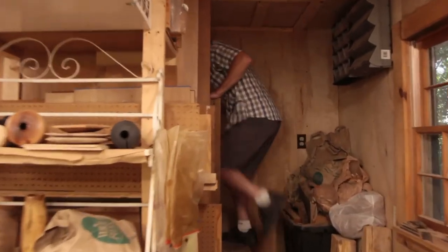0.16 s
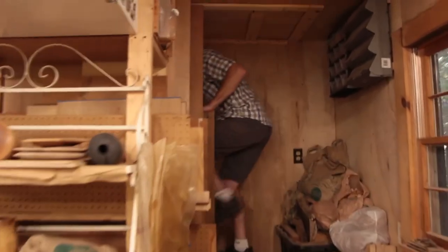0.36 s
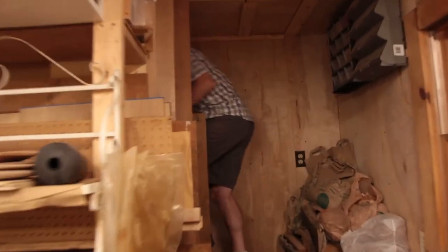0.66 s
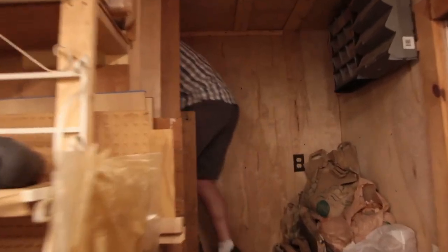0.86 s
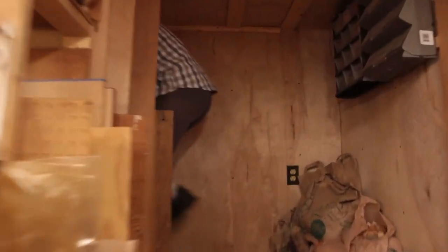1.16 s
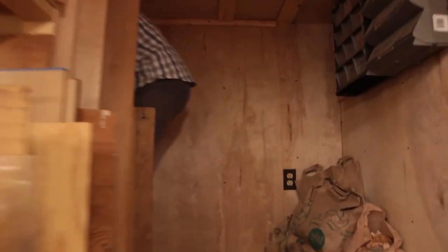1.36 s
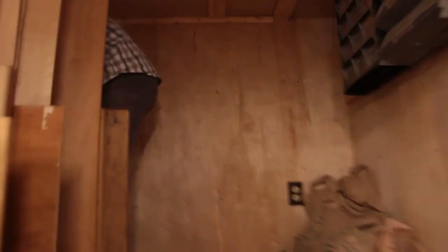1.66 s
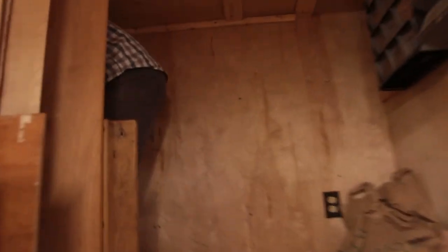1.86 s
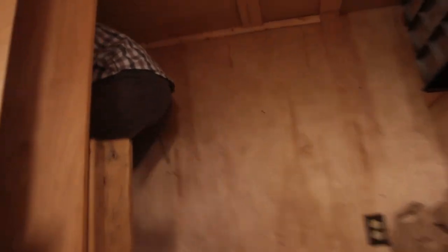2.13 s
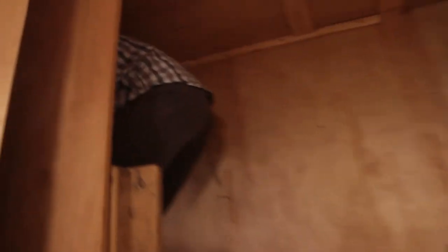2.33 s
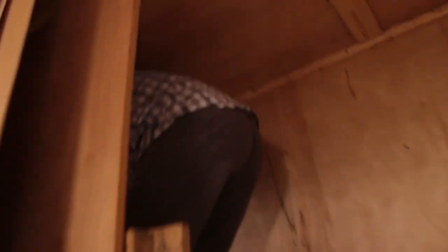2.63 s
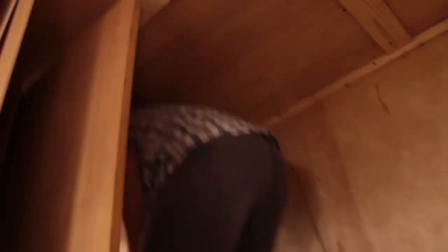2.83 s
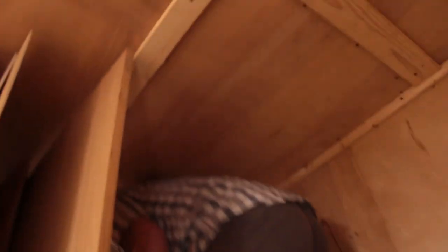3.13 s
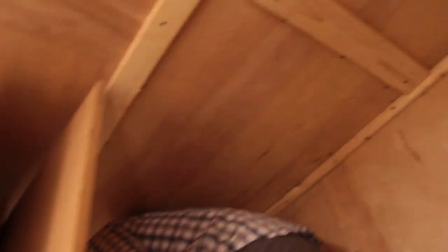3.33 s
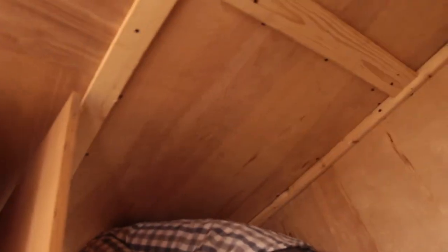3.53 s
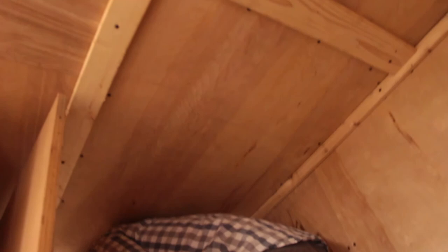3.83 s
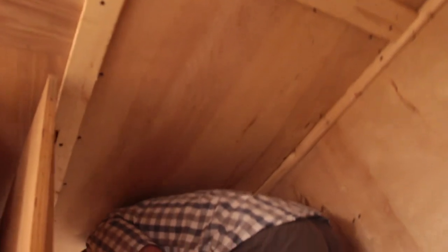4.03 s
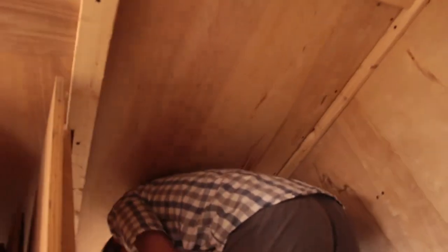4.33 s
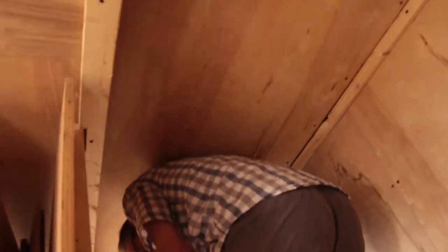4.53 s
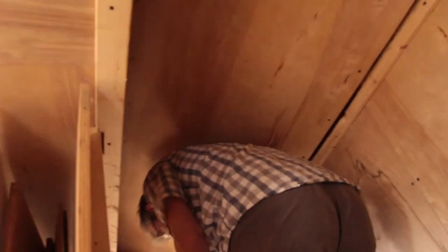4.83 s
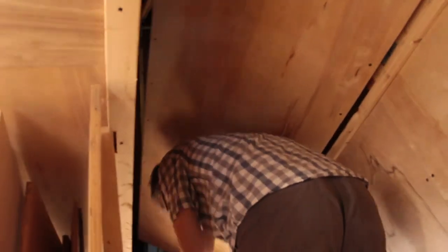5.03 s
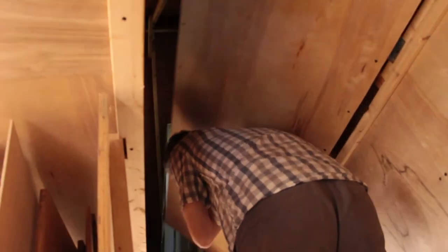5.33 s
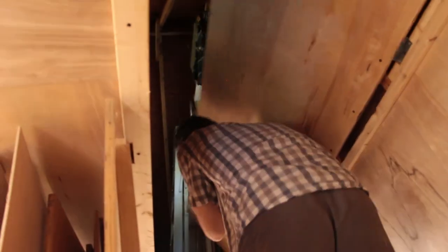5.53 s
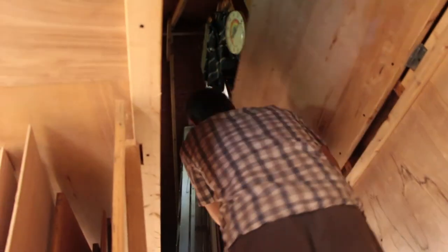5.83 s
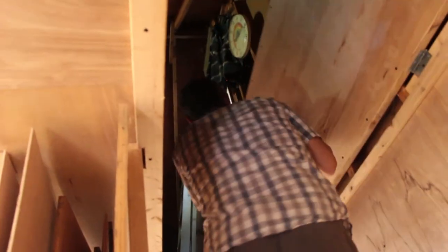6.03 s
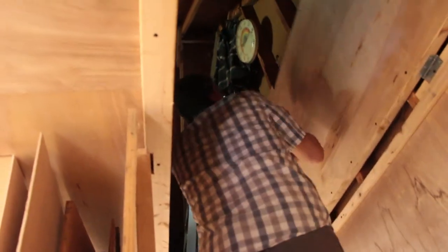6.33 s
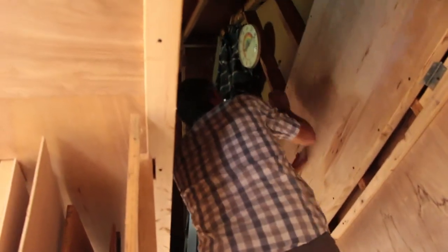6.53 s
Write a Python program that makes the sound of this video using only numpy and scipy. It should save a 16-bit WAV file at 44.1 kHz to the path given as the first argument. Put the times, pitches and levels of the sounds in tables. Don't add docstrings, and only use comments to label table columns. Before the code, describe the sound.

Three woody footfalls climb creaky timber treads in a small humming workshop, followed by bolt chatter, cloth dragging, a deep boom and a clattering landing.

```python
import sys
import numpy as np
from scipy import signal
from scipy.fft import rfft, irfft
from scipy.io import wavfile
from scipy.ndimage import uniform_filter1d

SR = 44100
rng = np.random.default_rng(int(sys.argv[2]) if len(sys.argv) > 2 else 0)


def bounce(signal):
    frames = np.transpose(np.atleast_2d(signal))
    limited = np.clip(frames, -1, 1)
    pcm = np.round(limited * 32767).astype(np.int16)
    wavfile.write(sys.argv[1], SR, pcm)


def gain_from_db(level_db):
    decades = np.asarray(level_db, float) / 20
    return 10 ** decades


N = 294595

ROOM_DB = -11
LEAD_S = 0.001


def rms_one(x):
    return x / np.sqrt(np.mean(x ** 2) + 1e-20)


def in_time(rows):
    s, *columns = np.transpose(rows)
    return [np.interp(np.arange(N) / SR, s, c) for c in columns]


def at_hz(points, hz):
    points = np.array(points)
    return np.interp(np.log(hz), np.log(points[:, 0]), points[:, 1])


def drift(rate):
    r = np.exp(-80 * np.pi * rate / SR)
    slow = signal.lfilter([1], [1, -2 * r, r * r], rng.standard_normal(N // 40 + 2002))[2000:]
    return np.interp(np.arange(N) / 40, np.arange(len(slow)), rms_one(slow))


def swells(rows):
    t = np.arange(0, N + 16, 16) / SR
    humps = 0
    for s, level_db, rise, fall in rows:
        quarter = np.interp(t, [s - rise, s, s + fall], [0, np.pi / 2, 0])
        humps = humps + gain_from_db(level_db) * np.sin(quarter) ** 2.8
    return np.interp(np.arange(N) / SR, t, humps)


def add(out, s, sound):
    at = round(s * SR)
    out[at:at + len(sound)] += sound[:N - at]


def bandpass(x, order, low_hz, high_hz):
    return signal.sosfilt(signal.butter(order, [low_hz, high_hz], "band", fs=SR, output="sos"), x)


def banded(spectrum, patchy_db, grain_db):
    out = 0
    low, high = spectrum[0][0], spectrum[-1][0]
    white = rng.standard_normal((2, N)) * gain_from_db(grain_db * drift(140))
    edges = np.geomspace(low, high, 2 + int(2 * np.log2(high / low)))
    for k, (low_hz, high_hz) in enumerate(zip(edges, edges[1:])):
        band = bandpass(white[k % 2], 2, low_hz, high_hz)
        level_db = at_hz(spectrum, np.sqrt(low_hz * high_hz)) + patchy_db * drift(2.8)
        out = out + gain_from_db(level_db) * band
    return out


def resonance(x, hz, width_hz):
    r = np.exp(-np.pi * width_hz / SR)
    poles = [1, -2 * r * np.cos(2 * np.pi * hz / SR), r * r]
    return signal.lfilter([(1 - r * r) / 2, 0, (r * r - 1) / 2], poles, x)


def workshop(x, echo_db=ROOM_DB):
    t60_s = 0.27
    t = np.arange(SR // 3) / SR
    dull, bright = rng.standard_normal((2, len(t))) * (t > 0.003)
    dull = bandpass(dull, 1, 150, 3800)
    echoes = rms_one(dull) * gain_from_db(-60 * t / t60_s) + 2.77 * bright * gain_from_db(-60 * t / (0.61 * t60_s))
    return x + gain_from_db(echo_db) * signal.fftconvolve(x, echoes / np.linalg.norm(echoes))[:len(x)]


# frequency_hz, level_db
AIR = [(79, -35), (135, -4), (162, -9.5), (232, -1), (374, -42.5), (525, -12.5), (695, -26.5),
       (1510, -35.5), (1780, -25.5), (4920, -37), (13100, -46.5), (16000, -35)]


def room_air():
    return gain_from_db(-52) * rms_one(banded(AIR, patchy_db=0.5, grain_db=0.0))


# frequency_hz, level_db (rms)
HUM = [
    (58.55, -34.5),
    (92.5, -43.5),
    (117.1, -40),
    (175.7, -55),
    (234.2, -55.5),
    (543.7, -68.5),
    (602.9, -66.5),
    (877.5, -68.5),
    (1771, -88),
]
# time_s, level_db of the lowest line
BEARING = [(0, -1), (.76, -2.5), (1.1, -6), (1.8, -5), (2.18, -0.5), (2.55, -3), (3.05, -1.5), (3.6, 0),
           (4.7, 0.5), (5.1, -1), (6.68, -1)]
# time_s, level_db
EXPOSED = [(.5, -4), (1.1, -0.7), (4.7, -0.5), (5.3, -4.5)]


def motor():
    mains_hz, in_step_s, mains_db = 120, 3.3, -9
    t = np.arange(N) / SR
    slip = 0.00035 * np.cumsum(drift(1.4)) / SR
    turns, levels = [], []
    for hz, level_db in HUM:
        turns.append(hz * (t + slip) + rng.random())
        levels.append(gain_from_db(level_db + 2 + 0.26 * drift(3.0)))
    lowest, *upper = np.multiply(levels, np.sin(2 * np.pi * np.array(turns)))
    mains_turns = mains_hz * (t - in_step_s) + turns[2][round(in_step_s * SR)]
    buzz = levels[2] * gain_from_db(mains_db) * np.sin(2 * np.pi * mains_turns)
    return gain_from_db(in_time(BEARING)[0]) * lowest + gain_from_db(in_time(EXPOSED)[0]) * (sum(upper) + buzz)


# time_s, level_db
WEIGHT = [(0, -55.5), (.37, -39.5), (.65, -39.5), (1.51, -51), (1.69, -30), (2.01, -45), (2.47, -38.5),
          (2.71, -37.5), (2.88, -45), (3.31, -45), (3.81, -50), (4.33, -30.5), (4.76, -55), (5.07, -36),
          (5.45, -44.5), (6.19, -41.5), (6.47, -53), (6.68, -41)]
# loudest_s, level_db, rise_s, fall_s
SHUFFLES = [
    (2.88, -44.5, 0.062, 0.24),
    (3.81, -56, 0.26, 0.2),
    (5.05, -47.5, 0.51, 0.35),
    (5.65, -54.5, 0.29, 0.99),
    (6.64, -43, 0.16, 0.086),
]


def frame():
    shiver_db, = in_time(WEIGHT)
    shiver = rms_one(bandpass(rng.standard_normal(N), 2, 22, 42))
    rumble = rms_one(bandpass(rng.standard_normal(N), 2, 45, 300))
    rumble_level = (gain_from_db(-53.5) + swells(SHUFFLES)) * gain_from_db(0.51 * drift(26))
    return gain_from_db(shiver_db) * shiver + rumble_level * rumble


# loudest_s, level_db, rise_s, fall_s, brightness_db
BRUSHES = [(.001, -52.5, .01, 0.023, -16.5), (.33, -63.5, 0.38, 0.24, -4.5), (.436, -61.5, 0.099, 0.2, -10),
           (.822, -62, 0.11, 0.16, 8), (1.23, -63.5, 0.4, 0.18, 2), (1.66, -72, 0.08, 0.14, 9),
           (1.888, -69, 0.17, .07, 1), (2.06, -67, 0.2, 0.28, 2.5), (2.7, -70.5, 0.077, .04, -17),
           (3.75, -76, .13, 0.22, 0), (3.97, -70, 0.058, 0.15, -10), (4.86, -72, 0.19, 0.089, -20),
           (5.784, -57.5, 0.089, 0.089, -12), (5.96, -73, 0.16, 0.11, 10), (6.146, -58, 0.01, 0.065, -11),
           (6.478, -51, 0.13, 0.12, -13), (6.6, -69, 0.053, 0.08, -12)]
# loudest_s, level_db, rise_s, fall_s, brightness_db
DRAGS = [
    (4.97, -56, 0.12, 0.049, -5),
    (5.076, -45, 0.14, 0.15, -7.5),
    (5.33, -52, 0.093, 0.15, -8.5),
    (5.46, -50.5, 0.13, 0.21, -12),
    (5.62, -56, 0.14, 0.22, -5),
]
# start_s, rasp_db, bright_db, rise_s, length_s
SCUFFS = [(0.548, -49, -49, 0.0025, 0.035), (0.76, -62, -59, .003, .012), (0.813, -62, -69, 0.0073, 0.0098),
          (0.85, -57, -66, 0.0089, 0.014), (1.589, -70, -61, .005, 0.028),
          (2.3862, -33.5, -54, 0.001, 0.004), (2.388, -43, -55, .004, 0.016),
          (2.751, -54, -74, 0.012, 0.025), (2.844, -50, -61, .001, 0.033),
          (2.901, -57, -63.5, 0.0044, 0.078), (4.227, -59, -58, 0.0044, 0.013),
          (4.238, -58, -64, .02, 0.064), (4.305, -54, -62, 0.04, 0.27), (4.318, -55, -60, 0.0043, 0.023),
          (5.1798, -45, -49, 0.001, 0.0095), (5.184, -54, -47, .008, 0.03),
          (5.942, -76, -68, 0.0045, 0.022), (6.143, -53, -68, .002, 0.007),
          (6.487, -48.5, -51.5, .006, 0.049), (6.631, -63, -60, .004, 0.017)]
STIR_DB = [-61.5, -75.5, -73.5]
# frequency_hz, level_db
DULL = [(350, -3), (800, -1.5), (1800, -7)]
RASP = [(1400, 0.5), (2800, 2), (5600, -5)]
BRIGHT = [(2650, -31), (4500, 3.5), (4900, 1), (7730, -5.5), (15000, -8.5), (16000, -17)]


def register(rows, over_db, lean):
    return swells([(s, db + over_db + lean * tilt_db, rise, fall) for s, db, rise, fall, tilt_db in rows])


def rustle():
    dull_trade = 0.63
    dull = gain_from_db(STIR_DB[0]) + register(BRUSHES, -1.5, -dull_trade) + register(DRAGS, -11, -dull_trade)
    rasp = gain_from_db(STIR_DB[1]) + register(BRUSHES + DRAGS, 0, 0)
    bright = gain_from_db(STIR_DB[2]) + register(BRUSHES + DRAGS, 0, 0.51)
    t = np.arange(SR) / SR
    for s, rasp_db, bright_db, rise, length in SCUFFS:
        fade = np.exp(-(np.maximum(t - rise, 0) / length) ** 2.1)
        stroke = np.minimum(t / rise, 1) * fade
        add(dull, s, gain_from_db(rasp_db - 3.0) * stroke)
        add(rasp, s, gain_from_db(rasp_db) * stroke)
        add(bright, s, gain_from_db(bright_db) * stroke)
    out = 0
    for level, spectrum in ((dull, DULL), (rasp, RASP), (bright, BRIGHT)):
        out = out + level * rms_one(banded(spectrum, patchy_db=1.7, grain_db=0.5))
    return out


# frequency_hz, width_hz, level_db
LATCH = [
    [(403, 21, 0.5), (652, 36, 7)],
    [(900, 55, -13), (1071, 46, -1.5)],
    [(1676, 24, -3)],
    [(1400, 60, -2), (2200, 150, -5)],
    [(3160, 250, -0.5), (3760, 300, 4.5), (4100, 490, 3.5), (5550, 380, 0), (6240, 500, -1)],
]
# loudest_s, level_db, rise_s, fall_s
SLIDE = [
    [(4.33, -44, 0.03, 0.083), (4.43, -50, 0.053, 0.091), (4.5, -53, 0.036, 0.056),
     (4.56, -51.5, 0.07, 0.039)],
    [(4.322, -49, 0.015, 0.04), (4.365, -48.5, .03, 0.05), (4.41, -42, 0.02, 0.034),
     (4.455, -46.5, 0.048, 0.068)],
    [(4.34, -54, .03, .05), (4.408, -43, .008, 0.026), (4.455, -50, 0.033, .04), (4.505, -56, 0.043, .04)],
    [(4.34, -62, 0.032, .06), (4.41, -61, .012, 0.027), (4.46, -59, 0.045, 0.074),
     (4.578, -53, 0.056, 0.066)],
    [(4.335, -52, 0.053, 0.091), (4.405, -53.5, .012, 0.041), (4.46, -48, 0.038, 0.055),
     (4.52, -54.5, 0.035, 0.054), (4.59, -53.5, 0.076, 0.12)],
]


def locked(x):
    sing = 0.64
    x = rms_one(x)
    return x / (uniform_filter1d(x ** 2, size=300) + 0.05) ** (sing / 2)


def latch():
    slips = (rng.random(N) < 2500 / SR) * rng.standard_normal(N)
    pressure = drift(47.5)
    slips = slips * gain_from_db(0.98 * pressure) + 1e-18
    out = 0
    for k, (part, bursts) in enumerate(zip(LATCH, SLIDE)):
        rung = 0
        for hz, width_hz, level_db in part:
            once = resonance(slips, hz, 1.3 * width_hz)
            rung = rung + gain_from_db(level_db) * locked(resonance(once, hz, 1.3 * width_hz))
        push = uniform_filter1d(np.roll(pressure, k * SR), size=900)
        bent = np.arange(N) + 0.008 * np.cumsum(push)
        out = out + swells(bursts) * rms_one(np.interp(bent, np.arange(N), rung))
    return out


# start_s, peak_db, low_hz, high_hz, t60_s
CRACKS = [(0.5513, -22, 2420, 4100, 0.02), (.557, -39, 2000, 4300, 0.074), (.565, -27.5, 500, 2600, 0.087),
          (0.567, -40, 4000, 7000, .04), (1.5175, -19.5, 900, 4850, 0.016),
          (1.528, -32.5, 2200, 5200, 0.049), (1.549, -40, 2500, 4800, 0.037), (1.55, -39, 700, 2600, 0.062),
          (2.334, -31, 1800, 6260, 0.012), (2.334, -52, 7000, 15000, .04),
          (2.343, -29.5, 1000, 3280, 0.068), (2.3425, -45, 4000, 7500, 0.11),
          (2.343, -50, 7500, 15000, .06), (2.3862, -28, 1500, 7300, 0.043),
          (2.386, -37, 7500, 15500, 0.022), (2.849, -41, 1000, 9000, .015), (4.2965, -37, 1500, 9000, .012),
          (4.316, -45, 695, 1500, .04), (4.404, -42, 1200, 4500, .03), (5.181, -39, 600, 5000, .03),
          (5.183, -40, 6000, 15500, .02), (6.464, -28, 800, 1800, 0.061), (6.477, -20.5, 200, 700, 0.038),
          (6.4889, -27, 510, 2650, 0.022), (6.497, -28, 900, 2540, 0.056), (6.516, -28, 700, 2280, 0.071),
          (6.602, -32, 300, 1500, 0.05), (6.619, -40, 393, 2440, 0.035)]


def cracks():
    out, t = np.zeros(N), np.arange(SR // 6) / SR
    for s, peak_db, low_hz, high_hz, t60 in CRACKS:
        noise = rng.standard_normal(len(t)) * gain_from_db(-60 * t / t60)
        band = bandpass(noise, 4, low_hz, high_hz)
        add(out, s, gain_from_db(peak_db) * band / np.abs(band).max())
    return out


# loudest_s, peak_db, pitch_hz, rise_s, fall_s
CHOKED = [(.5533, -9, 807, .003, 0.0034), (.566, -24, 613, .006, 0.0064), (.576, -28, 800, .006, .008),
          (1.5178, -10.5, 1490, 0.0012, 0.0012), (1.5204, -6.5, 450, 0.0027, 0.0038),
          (1.5247, -12, 366, .003, 0.0064), (0.5521, -21, 2910, .0015, .004), (.558, -29, 2100, .003, .004),
          (.564, -25, 1400, 0.0036, .005), (2.884, -36, 518, .006, 0.011), (4.575, -39, 250, .015, .015),
          (4.5, -50, 654, .04, .04), (2.91, -36, 500, 0.0041, .012), (5.1837, -35, 2500, 0.00111, 0.0033),
          (6.482, -20, 650, .004, 0.0021), (6.483, -23, 1350, .003, .003),
          (6.514, -22.5, 900, 0.0031, .004), (6.621, -27.5, 762, .004, 0.0045),
          (2.3339, -19, 2470, 0.00088, .003), (2.337, -15, 388, 0.0033, 0.0084),
          (5.1852, -19, 704, 0.0019, 0.0039), (5.191, -41, 4500, 0.0064, .005),
          (6.4868, -17.5, 1590, .002, 0.0026), (6.4875, -12, 690, 0.0041, 0.0048),
          (6.4906, -14.5, 1255, 0.0019, .003), (6.498, -20.5, 1550, .003, 0.0023)]


def choked():
    out, t = np.zeros(N), np.arange(SR // 10) / SR
    for s, peak_db, hz, rise, fall in CHOKED:
        grip = np.sin(np.interp(t, [0, rise, rise + fall], [0, np.pi / 2, 0])) ** 2.5
        add(out, s - rise, gain_from_db(peak_db) * grip * np.sin(2 * np.pi * hz * t))
    return out


# start_s, peak_db, pitch_hz, t60_s
RINGS = [(0.551, -22, 3050, 0.013), (.553, -27, 990, .09), (.554, -32, 800, 0.081), (.555, -28, 526, 0.12),
         (0.557, -27, 1213, 0.075), (.553, -34, 3300, 0.064), (0.557, -16.5, 188, 0.098),
         (0.559, -30, 1464, 0.075), (1.4515, -44, 3050, 0.028), (1.518, -30, 1663, 0.04),
         (1.519, -16, 450, 0.066), (1.52, -28, 372, 0.07), (1.52, -24, 860, 0.11), (1.52, -25, 1210, 0.096),
         (1.521, -26, 631, 0.076), (1.519, -33, 3030, 0.047), (2.335, -35, 2035, 0.07),
         (2.335, -39, 2640, 0.063), (2.336, -33, 1760, 0.074), (2.334, -28, 1486, 0.033),
         (2.335, -14, 198, 0.07), (2.3355, -27, 1204, 0.073), (2.338, -27, 397, 0.071),
         (2.389, -31, 2600, .02), (4.206, -43, 2560, .02), (4.213, -42, 5900, 0.018),
         (4.216, -44, 2460, 0.023), (4.296, -40, 6380, 0.023), (4.2965, -48, 5200, 0.022),
         (4.312, -37, 900, .06), (4.314, -40, 1096, .08), (4.3228, -48, 3000, .03),
         (4.404, -41, 537, 0.069), (4.405, -43, 2100, 0.056), (4.405, -39, 1690, 0.09),
         (5.183, -31, 780, 0.026), (5.184, -36, 3750, 0.042), (6.489, -23.5, 2160, 0.025),
         (6.49, -13.5, 398, 0.098), (6.49, -25, 844, .12), (6.49, -22, 1003, .06), (6.49, -22, 1276, .05),
         (6.492, -30, 1380, .11), (6.618, -27, 593, 0.033)]


def rings():
    out, t = np.zeros(N), np.arange(SR // 8) / SR
    for s, peak_db, hz, t60 in RINGS:
        onset = np.minimum(t * hz, 1)
        add(out, s, gain_from_db(peak_db - 60 * t / t60) * onset * np.sin(2 * np.pi * hz * t))
    return out


# start_s, peak_db, settled_hz, extra_turns, t60_s
THUDS = [(.553, -22, 129, 0.59, 0.22), (.594, -19, 57.2, 0.24, 0.32), (1.52, -15, 62.7, 1.76, 0.26),
         (2.332, -18, 57.6, 1.66, 0.19), (2.381, -14.5, 94, 0.15, 0.084), (2.872, -18.5, 97, 0.71, 0.06),
         (2.906, -22.5, 60, 1.1, .13), (3.813, -22.5, 59.4, 0.42, 0.18), (3.998, -22.5, 85.7, 0.16, 0.22),
         (4.798, -32, 182, 1.3, 0.072), (4.904, -23, 121, 1.24, 0.041), (4.95, -24, 122, 0.67, 0.047),
         (5.1836, -3.5, 56.5, 0.93, 0.17), (5.785, -23.5, 109, 0.6, 0.044), (6.4865, -7, 228, -0.19, 0.13),
         (6.4885, -8, 89.6, 0.17, 0.17), (6.613, -17.5, 204, 0.074, 0.087)]
# start_s, peak_db, settled_hz, extra_turns, t60_s
LURCHES = [(.02, -11.5, 28.4, 0.076, 0.089), (.147, -27, 27.8, 0.018, 0.48), (.581, -16.5, 26.8, 0.22, 0.5),
           (.78, -26.5, 29.1, 0.46, 0.59), (1.568, -18.5, 27, 0.21, 0.29), (2.356, -14, 28.3, 0.076, 0.49),
           (4.05, -18.5, 35.1, 0.51, 0.6), (4.286, -19, 29, 0.052, 0.24), (4.407, -20, 30, 0.22, 0.097),
           (5.231, -17.5, 26.5, 0.043, 0.41), (5.796, -12, 34, 0.77, 0.087), (6.165, -36, 29.55, .08, 0.22),
           (6.4995, -8, 38.2, 0.79, 0.2), (6.627, -16, 30, 0.2, 0.16)]


def thumps():
    out, t = np.zeros(N), np.arange(SR // 2) / SR
    for rows, sag_s, soften in ((THUDS, 0.0071, 0.4), (LURCHES, 0.02, 0.02)):
        for s, peak_db, hz, extra, t60 in rows:
            sag = sag_s * gain_from_db(-soften * peak_db)
            turns = hz * t + extra * (1 - np.exp(-t / sag))
            swell = 1 - np.exp(-(turns / 0.22) ** 1.4)
            add(out, s, gain_from_db(peak_db + 3 - 60 * t / t60) * swell * np.sin(2 * np.pi * turns))
    return out


def coloured(x, colour):
    spectrum, hz = rfft(x, 2 * len(x)), np.linspace(1, SR / 2, len(x) + 1)
    grid = np.geomspace(100, 17000, 400)
    power = np.interp(grid, hz, np.abs(spectrum) ** 2)
    own_db = 10 * np.log10(uniform_filter1d(power, size=24) + 1e-12)
    gain = gain_from_db(at_hz(colour, hz) - np.interp(hz, grid, own_db))
    gain = gain * np.clip(hz / 130, 0, 1) ** 4
    return irfft(spectrum * gain)[:len(x)]


def struck(colour, t60, roll, echo_db=ROOM_DB):
    count = 230
    t = np.arange(SR // 7) / SR
    place, phase, late, damping = rng.random((4, count, 1))
    share = (np.arange(count)[:, None] + place) / count
    hz = 130 + 15000 * share ** 2.5
    since = np.maximum(t - roll * late ** 1.403 - 0.52 / hz, 0)
    speed = (hz / 1000) ** 0.43 * (1.0 + 0.9 * damping) / t60
    level_db = at_hz(colour, hz) + 15 * np.log10(share + 0.02) + 10 * np.log10(speed)
    modes = gain_from_db(level_db - 60 * since * speed) * np.sin(2 * np.pi * (hz * since + 0.63 * phase))
    blow = (modes * np.minimum(since / 0.00017, 1)).sum(axis=0)
    lead = round(LEAD_S * SR)
    sound = coloured(workshop(np.pad(blow, (lead, len(t))), echo_db), colour)
    fade_in = np.minimum(np.arange(len(sound)) / lead, 1)
    sound = sound * np.sin(fade_in * np.pi / 2) ** 2
    return sound / np.sqrt(2 * uniform_filter1d(sound ** 2, size=300).max())


# start_s, peak_db, t60_s, roll_s, echo_db
STEPS = [
    (0.5509, -19, 0.13, 0.0016, -13),
    (1.517, -11, 0.066, 0.0021, -15),
    (2.333, -17.5, 0.093, 0.0019, -8.5),
    (5.183, -26.5, 0.072, 0.0026, -10),
    (6.4835, -12, 0.047, .012, -25),
    (6.611, -26, 0.024, 0.02, -13),
]
# frequency_hz, level_db (per Hz)
BOARDS = [
    [(120, -32), (200, -5.5), (721, -4), (1110, -11), (1430, -11), (1630, -15.5), (3290, -22), (4980, -31),
     (15000, -67)],
    [(120, -32), (200, 1.5), (300, -10), (520, -3), (761, -11), (1300, -13.5), (3060, -22), (6500, -53),
     (15000, -77)],
    [(120, -29), (200, -3), (946, -11), (1090, -16.5), (2550, -21.5), (4810, -39), (15000, -80)],
    [(180, -48), (300, -16.5), (1090, -21.5), (2870, -33), (3860, -31), (5350, -34), (15000, -42)],
    [(180, -37), (310, -3), (520, 0.5), (841, -6.5), (1090, -9.5), (1420, -12), (2560, -31.5), (15000, -53)],
    [(180, -25), (300, -10), (597, -2.5), (959, -14), (1370, -14), (3220, -41), (15000, -53)],
]
# start_s, peak_db (near 1 kHz), boards_db, click_db, scuff_db
KNOCKS = [(0.764, -39, 6.5, -31, -13), (1.451, -57, 0, 4, -32), (2.867, -37, 12.5, 5, -42),
          (2.907, -35.5, 4, -4, -26), (4.063, -45.5, 1.5, 9, 2.5), (4.089, -50, -20, 7.5, 4),
          (4.205, -45, -3, 5.5, -2), (4.216, -45, 4, 8.5, 7), (4.297, -44, 2, -10, 8),
          (4.901, -49, 18.5, -25.5, -25), (5.918, -33.5, -5, -23, -24), (6.147, -34, -39, -10, -22),
          (6.499, -12, -2, -12, -16.5)]


def knocks():
    out = np.zeros(N)
    for (s, peak_db, t60, roll, echo_db), board in zip(STEPS, BOARDS):
        add(out, s - LEAD_S, gain_from_db(peak_db) * struck(board, t60, roll, echo_db))
    for s, peak_db, boards_db, click_db, scuff_db in KNOCKS:
        colour = [(280, boards_db + 12.5), (1050, 0), (3200, click_db - 10.0),
                  (9000, scuff_db - 12.5), (15000, scuff_db - 30)]
        loudest_db = max(0, boards_db, click_db, scuff_db)
        t60 = 0.1 * gain_from_db(-0.077 * (peak_db + 41))
        add(out, s - LEAD_S, gain_from_db(peak_db + loudest_db - 4.0) * struck(colour, t60, 0.004))
    return out


def scene():
    background = room_air() + motor() + frame() + rustle()
    ringing = workshop(latch() + rings() + choked())
    return (background + ringing + workshop(cracks()) + thumps() + knocks())[None]


def top_cut(x):
    return signal.sosfilt(signal.butter(12, 16430, fs=SR, output="sos"), x)


# frequency_hz, width_hz, depth_db
MIC_DIPS = [
    (4960, 1640, -5),
    (10520, 350, -22),
]


def record(dry):
    ceiling = 0.7
    for hz, width_hz, depth_db in MIC_DIPS:
        dry = dry - (1 - gain_from_db(depth_db)) * resonance(dry, hz, width_hz)
    flattened = dry / (1 + np.abs(dry / ceiling) ** 6) ** (1 / 6)
    mix = signal.sosfilt(signal.cheby2(10, 40, 16300, fs=SR, output="sos"), flattened)
    return top_cut(mix)


dry = scene()
out = record(dry)
bounce(out)
```